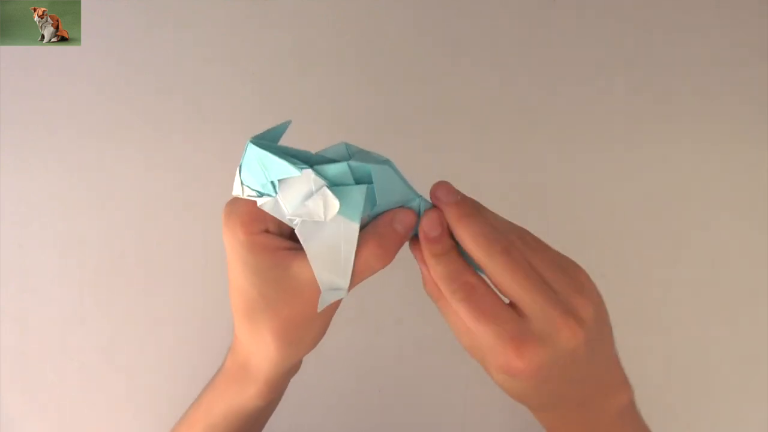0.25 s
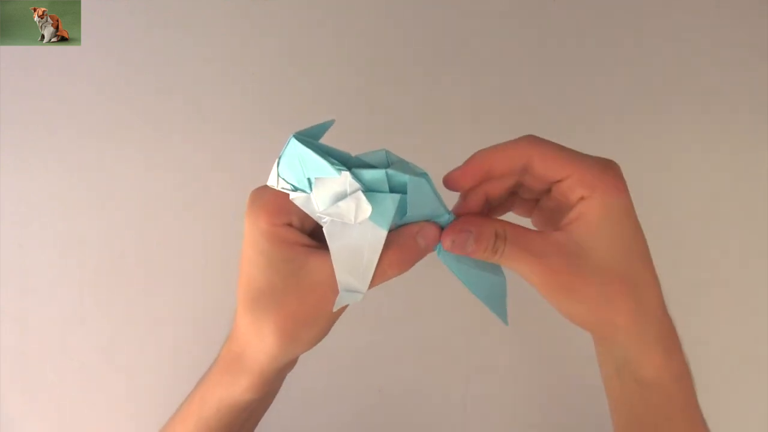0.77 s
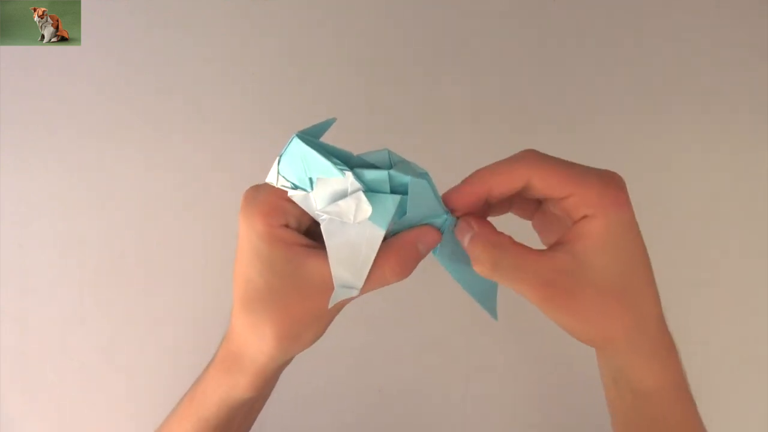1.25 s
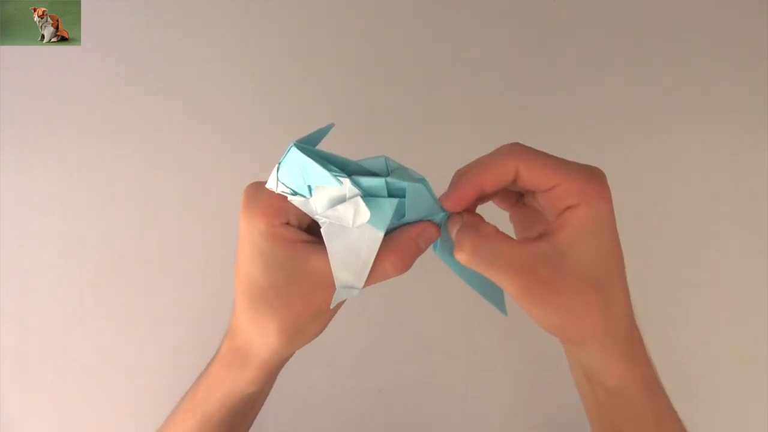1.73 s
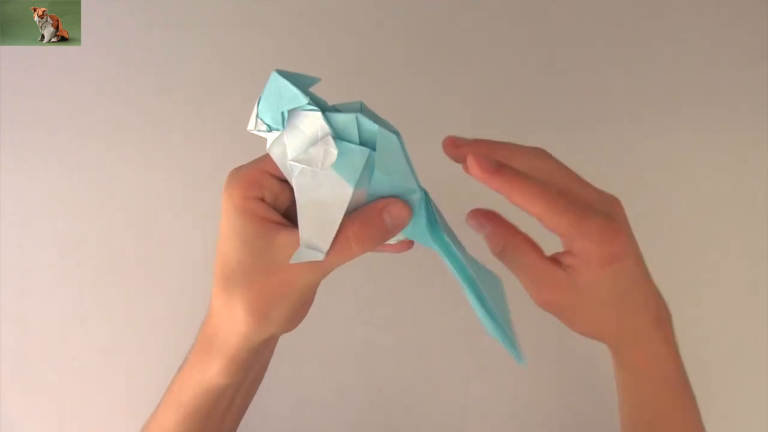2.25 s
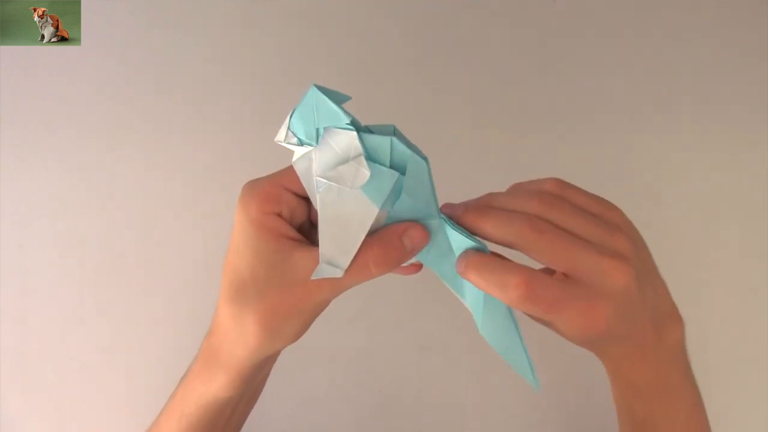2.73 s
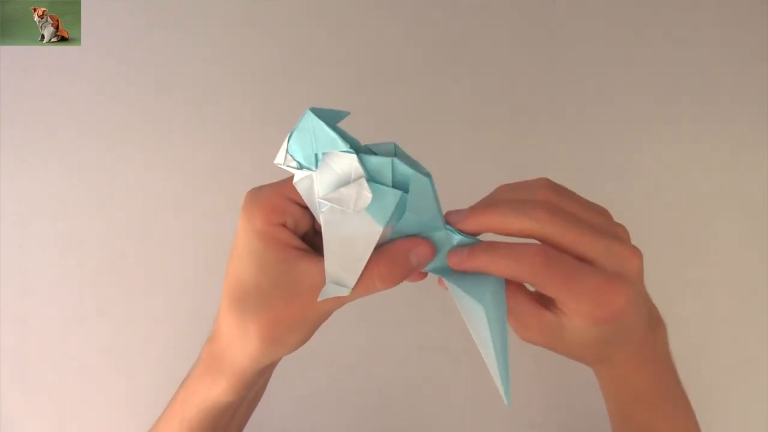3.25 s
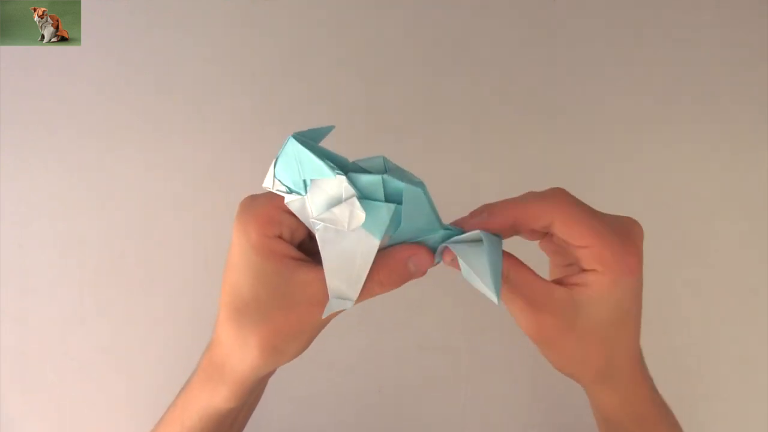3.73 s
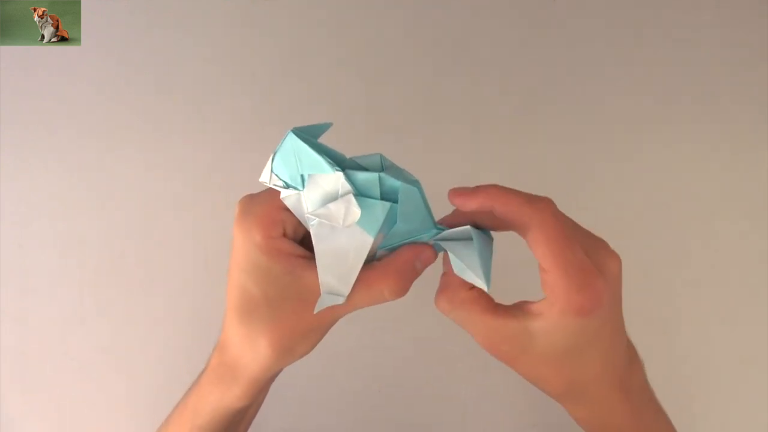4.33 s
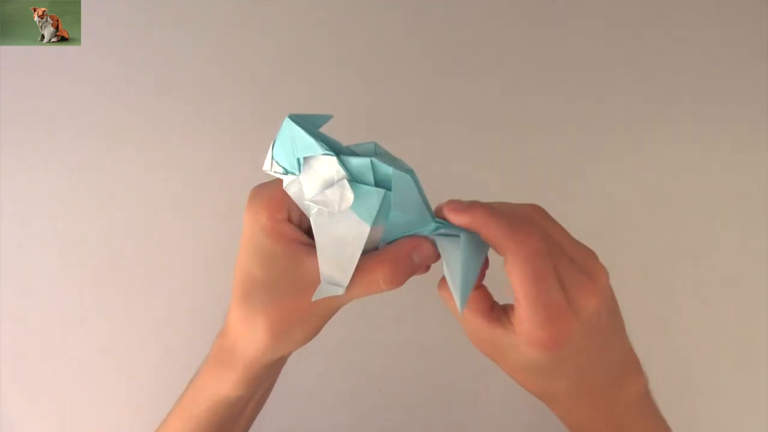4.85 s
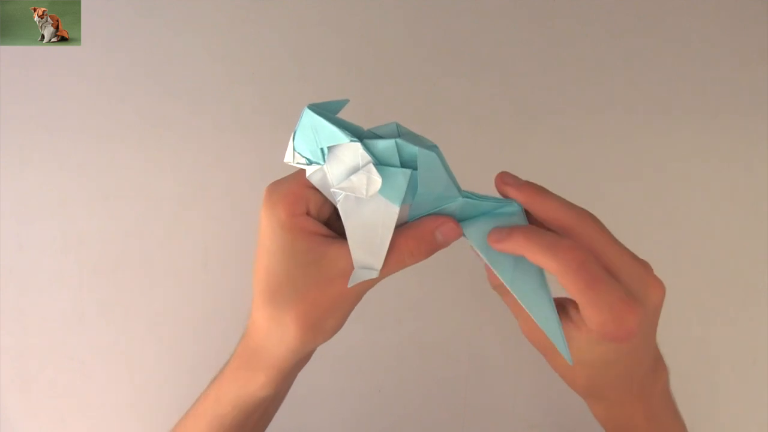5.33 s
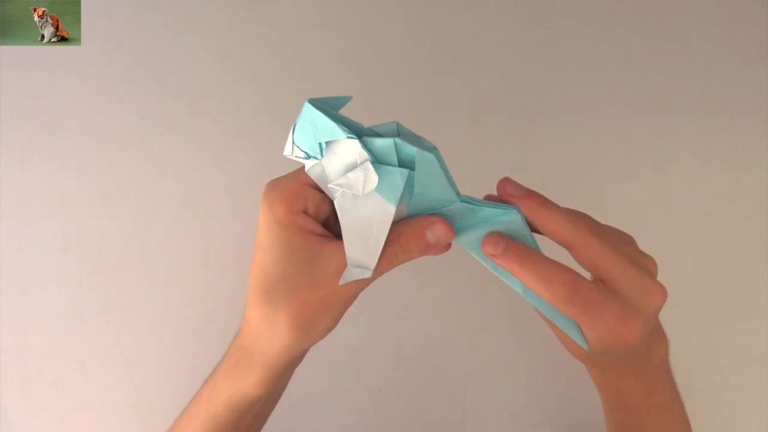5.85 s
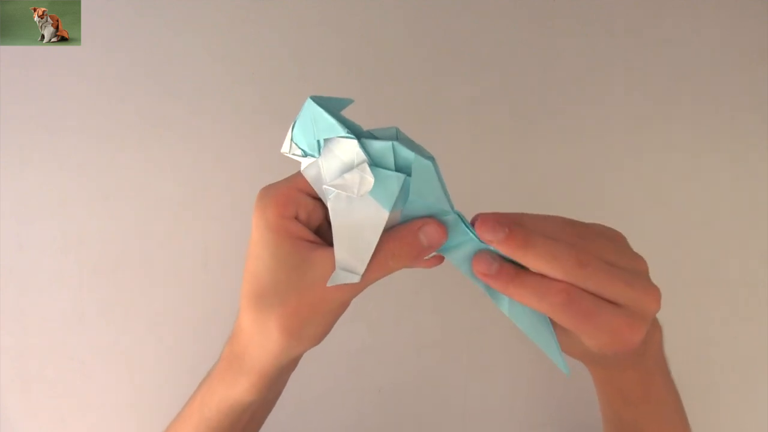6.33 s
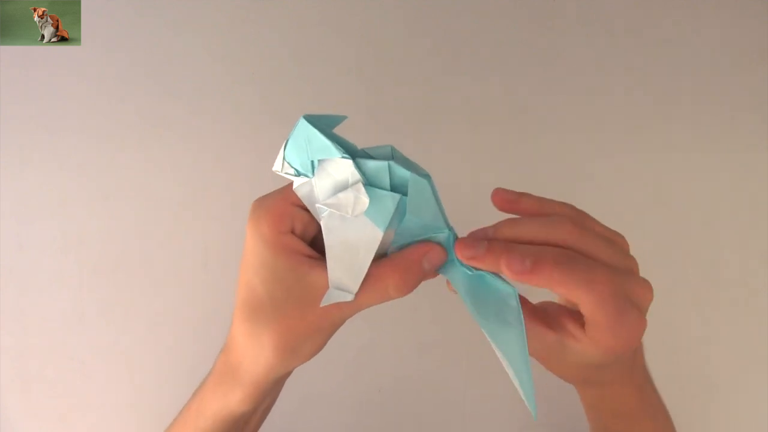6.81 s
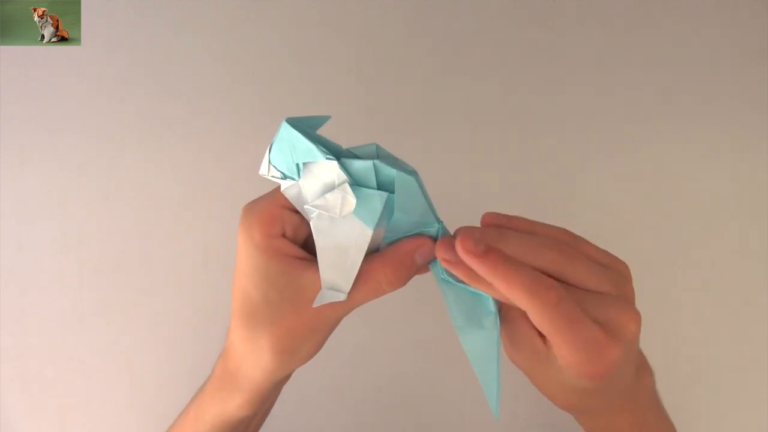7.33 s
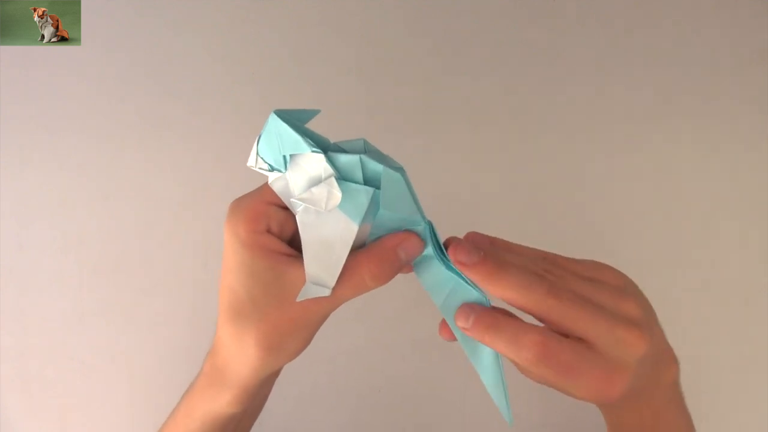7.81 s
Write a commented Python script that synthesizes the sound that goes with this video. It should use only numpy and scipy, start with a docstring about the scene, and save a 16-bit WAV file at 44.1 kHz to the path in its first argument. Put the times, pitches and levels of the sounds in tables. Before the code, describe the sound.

Close stereo pickup of hands working a small folded paper model in a bare, quiet room. After near silence, a tight cluster of bright crackles bursts just before one second, then single sharp snaps come at uneven gaps with tiny ticks and short grainy finger rubs between. A brief bright reverberation follows the louder snaps, and a low, steady airy rush lies underneath.

```python
"""Hands shaping a folded paper model

In a small, bare, quiet room, creases buckle with short dry snaps: shaped noise bursts coloured like paper.
Fingertips and paper layers slide with a grainy hiss, made of noise and random tiny ticks, and pinches
sound hollow pockets. A tabletop echoes the direct sound almost at once, and sparse random reflections add
a bright tail. Below it all lies a low steady rush of air, nearly unrelated left and right."""
import sys
import numpy as np
from scipy import signal
from scipy.fft import rfft, irfft, next_fast_len
from scipy.io import wavfile
from scipy.ndimage import uniform_filter1d

SR = 44100
rng = np.random.default_rng(int(sys.argv[2]) if len(sys.argv) > 2 else 0)


def wav_out(sig):
    """Save sig, one row per channel (or a flat mono array), as 16-bit PCM at SR to the path in sys.argv[1]."""
    wavfile.write(sys.argv[1], SR, np.round(np.clip(np.atleast_2d(sig).T, -1, 1) * 32767).astype(np.int16))


N = 355887  # length in samples


def gain_of(db):
    """Decibels to amplitude."""
    return 10 ** (np.asarray(db) / 20)


def evened(x):
    """Scales to rms 1."""
    return x / np.sqrt(np.mean(x ** 2) + 1e-20)


def read(points, hz):
    """Reads a spectrum table on a log-frequency axis."""
    f, value = np.transpose(points)
    return np.interp(np.log(hz + 1), np.log(f + 1), value)


def add(mix, s, sound):
    """Adds a stereo sound into the mix at time s, cutting whatever falls outside."""
    start = round(s * SR)
    sound = sound[:, max(-start, 0):]
    part = mix[:, max(start, 0):][:, :sound.shape[1]]
    part += sound[:, :part.shape[1]]


def lean(db):
    """Left and right gains for a left-over-right level difference."""
    return gain_of(np.array([[.5], [-.5]]) * db)


def noise_pair(apart, size):
    """Two noise channels, alike in the bass, drifting apart as waves get shorter than the microphone spacing."""
    shared = rng.standard_normal(size)
    own = signal.lfilter([1, -.75], [1, -.2], rng.standard_normal((2, size)))
    return (shared + apart * own) / np.hypot(1, apart)


def paper(x, hz, octaves, body_db, steep=2.07, size=1024):
    """Causal colour of paper: a broad hump from the moving facet plus the flexing of the whole model."""
    # Hollow resonances of the flexing model. Each row: frequency in Hz, relative level in dB.
    flexing = [(100, -40), (300, -7), (440, 1), (750, -2.5), (1060, 1), (1320, -4), (1900, -0.5),
               (3500, -4.5), (8000, -13), (16000, -43)]
    f = abs(np.fft.fftfreq(size, 1 / SR))
    # the hump falls to half amplitude this many octaves either side of its pitch
    facet = 1 / (1 + abs(np.log2((f + 1) / hz) / octaves) ** steep)
    body = gain_of(read(flexing, f) + body_db)
    log_gain = np.log(np.hypot(facet, body))
    # minimum phase, so nothing sounds ahead of its cause
    response = np.fft.ifft(np.exp(np.conj(signal.hilbert(log_gain)))).real
    return signal.fftconvolve(x, response[None, :size // 2], axes=1)[:, :x.shape[1]]


def snap(hz, octaves, body_db, ring, rise=0.00022, flutter_db=-24, flutter_t60=0.057,
         wobble_db=-7, wobble_t60=0.027, wobble_hz=800, crack_db=-1, crack_s=0.00021, apart=0.45, size=2048):
    """A crease flips: bending waves die fast, nearby layers flutter on faintly, and the model wobbles low."""
    t = np.arange(size) / SR
    flip = (1 - np.exp(-t / rise)) * gain_of(-60 * t / ring)
    crack = gain_of(crack_db) * np.exp(-t / crack_s)  # the fold's first sharp jump
    flutter = gain_of(flutter_db - 60 * t / flutter_t60)
    burst = noise_pair(apart, size) * (flip + crack + flutter)
    low_noise = signal.lfilter(*signal.butter(2, wobble_hz, fs=SR), noise_pair(apart, size))
    wobble = low_noise * gain_of(wobble_db - 60 * t / wobble_t60)
    spectrum = rfft(burst + wobble)
    # flatten the spectrum over wide bands, so the paper colour alone sets each snap's tone
    spectrum /= np.sqrt(uniform_filter1d(abs(spectrum) ** 2, size=64, axis=1))
    sound = paper(irfft(spectrum)[:, :-size // 8], hz, octaves, body_db)
    # as much energy in each channel as one millisecond at rms 1
    return sound * np.sqrt(SR / 1000 / np.sum(sound ** 2, axis=1, keepdims=True))


def snaps(count=5):
    """Buckling creases: each sends one waveform to the microphone and others toward the walls."""
    # Each row: start in seconds, level in dB over 1 ms ahead of the mix trims, facet pitch in Hz,
    # t60 of the flip in seconds, flexing body in dB.
    creases = [(0.4007, -37, 4100, 0.019, -9), (.536, -45.5, 4100, 0.02, 11), (0.5743, -44, 7300, 0.017, 5),
               (.7703, -43.5, 490, 0.018, -18), (0.8079, -23, 5160, 0.013, -1.5),
               (.884, -24, 3800, 0.023, -4.5), (0.8895, -26.5, 5800, 0.018, -23),
               (0.8938, -18.5, 7400, 0.011, -17), (.9066, -22, 6850, 0.0065, -17),
               (1.6383, -28.5, 2840, .014, -14), (1.984, -17.5, 6450, 0.014, -6.5),
               (2.1828, -38, 5500, 0.027, -3), (2.3104, -36, 6900, .01, -0.5),
               (2.6278, -41.5, 1010, 0.0076, -18), (2.641, -24.5, 6300, 0.008, -5),
               (2.6849, -36, 2300, 0.026, -5), (2.7539, -42.5, 1750, 0.0084, -16),
               (2.913, -41.5, 5500, 0.015, -2), (3.012, -21, 6700, 0.014, -7),
               (3.4144, -44.5, 866, 0.0075, -28), (4.2193, -31.5, 9250, 0.012, 0),
               (4.7835, -32.5, 5440, 0.012, 4.5), (4.9377, -31.5, 6470, 0.0064, -6.5),
               (5.0825, -40.5, 1120, 0.0094, -28), (5.181, -44.5, 3200, 0.012, -11),
               (5.2658, -28.5, 5300, 0.012, -3.5), (5.5587, -31, 6550, 0.0039, -11),
               (5.568, -27.5, 6140, 0.0028, -18), (5.68, -35.5, 6140, .006, -8),
               (5.71, -37.5, 5930, 0.012, -17), (5.952, -25.5, 7300, 0.003, -9.5),
               (5.9678, -19, 3100, 0.013, -9), (6.0201, -34.5, 3630, 0.015, 0),
               (6.2, -39.5, 6900, 0.02, -2), (6.3273, -32, 1760, .008, -13.5),
               (6.4002, -37, 4780, 0.0066, -5), (6.4577, -38.5, 5200, 0.022, -3),
               (6.6186, -29.5, 6900, 0.0057, -8), (6.9263, -40.5, 3470, 0.013, -8),
               (7.0088, -43.5, 2800, 0.017, -16), (7.1381, -41.5, 5360, 0.014, -6),
               (7.4988, -22, 7560, 0.0041, -13.5), (7.521, -40, 2200, .018, -3),
               (7.7864, -30, 5860, 0.016, -4.5), (7.8097, -18.5, 5020, 0.0098, -16),
               (7.8743, -37, 5200, 0.017, 3)]
    middling_ring_s, middling_hz = .012, 5500
    middling_octaves, widen_with_ring, widen_with_pitch = 0.77, 0.96, 0.23
    send_base_db, send_db_per_doubling = -4, 5.5
    near, spread = np.zeros((2, N)), np.zeros((count, 2, N))
    for s, db, hz, ring, body_db in creases:
        # a longer ring means a larger facet, wider in colour and louder in the room
        largeness = ring / middling_ring_s
        octaves = middling_octaves * largeness ** widen_with_ring * (hz / middling_hz) ** widen_with_pitch
        add(near, s, gain_of(db) * snap(hz, octaves, body_db, ring))
        send_db = send_base_db + send_db_per_doubling * np.log2(largeness)
        send = gain_of(db + send_db) / np.sqrt(count)
        for direction in spread:
            add(direction, s, send * snap(hz, octaves, body_db, ring))
    return near, spread


def rub(speed, hz, octaves, body_db, catches_per_s=560, catch_spread_db=2.5, catch_t60=0.009,
        hiss=0.72, apart=0.49):
    """Fibres catch and let go in tiny ticks over a smooth sliding hiss, louder as the paper slides faster."""
    size = len(speed)
    strengths = gain_of(catch_spread_db * np.minimum(rng.exponential(1, size), 4))
    catches = strengths * (rng.random(size) < catches_per_s / SR)
    # every catch dies away exponentially
    grain = evened(signal.lfilter([1], [1, -gain_of(-60 / (catch_t60 * SR))], catches))
    friction = noise_pair(apart, size) * np.hypot(hiss, grain)
    return speed * evened(paper(friction, hz, octaves, body_db))


def strokes(trim_db=-0.5):
    """Finger strokes, and hard pinches that make hollow pockets of the model sound: each swells and fades."""
    # Sliding strokes. Each row: peak time in seconds, length in seconds, level in dB ahead of the trim,
    # pitch in Hz, flexing body in dB.
    slides = [(0.122, 0.099, -55, 6300, -7.5), (0.202, 0.043, -49.5, 3800, -20),
              (0.427, 0.041, -52, 4300, -11), (0.903, 0.034, -36.5, 5400, -6.5),
              (1.199, 0.17, -57, 6800, -4), (1.433, .05, -54, 6200, -4), (1.966, 0.085, -44, 6670, 1.5),
              (2.1, .037, -44, 5200, 4.5), (2.656, 0.034, -44.5, 4900, 3.5), (2.759, 0.067, -49, 2110, -4),
              (2.94, 0.066, -57, 6640, -16), (3.203, .065, -53.5, 5760, -3), (3.322, 0.042, -49, 6500, -9),
              (3.469, 0.059, -48, 6900, -11), (3.904, 0.026, -49, 7400, -3), (4.243, 0.16, -56, 6600, -10),
              (4.852, 0.06, -55.5, 6000, -11), (4.964, 0.057, -53.5, 6460, -4),
              (5.182, 0.055, -55.5, 6500, 2), (5.407, .044, -56, 6000, 1.5),
              (5.556, 0.087, -48.5, 6060, -2), (5.714, 0.019, -42, 4300, -13),
              (5.925, 0.039, -52.5, 6940, -1), (6.014, 0.023, -46, 3350, 4), (6.217, 0.048, -56, 5800, -6),
              (6.367, 0.041, -53, 2580, -13), (7.079, 0.12, -62.5, 4600, 7), (7.521, 0.073, -48, 5200, -1),
              (7.646, 0.059, -49.5, 5800, -6.5), (7.883, 0.24, -54, 4870, -20),
              (8.028, 0.18, -59, 4500, -7)]
    # Hard pinches. Each row: peak time in seconds, length in seconds, level in dB ahead of the trim,
    # pocket pitch in Hz.
    pinches = [(0.774, 0.016, -45.5, 435), (1.995, 0.029, -44.5, 385), (2.106, 0.061, -54.5, 348),
               (2.318, 0.016, -48.5, 418), (2.638, 0.1, -54.5, 373), (2.749, .1, -59, 1800),
               (5.565, 0.041, -53, 1100)]
    bright_hz, bright_octaves, widen_when_dull, widest_octaves = 6500, 0.82, 2.1, 1.9
    pocket_width_hz, pocket_body_db = 270, -17.5
    swell_share = 0.51  # share of the length spent swelling
    out, t = np.zeros((2, N)), np.arange(-SR // 5, SR // 5) / SR
    stretch = t / np.where(t < 0, swell_share, 1 - swell_share)
    for s, length, db, hz, body_db in slides:
        speed = np.exp(-(stretch / length) ** 2)
        # a bright stroke is narrow in colour, a duller one wider
        octaves = min(bright_octaves * (bright_hz / hz) ** widen_when_dull, widest_octaves)
        add(out, s + t[0], gain_of(db + trim_db) * rub(speed, hz, octaves, body_db))
    for s, length, db, hz in pinches:
        speed = np.exp(-(stretch / length) ** 2)
        # a pocket's resonance is about as many Hz wide at any pitch
        octaves = np.log2(1 + pocket_width_hz / 2 / hz)
        add(out, s + t[0], gain_of(db + trim_db) * rub(speed, hz, octaves, pocket_body_db))
    return out


def grip(hz=6200, octaves=0.78, body_db=-2, tick_over_db=11, tick_ring=0.013, count=24):
    """The holding fingers never rest: a faint rustle, and tiny creases that give way at random moments."""
    # Loudness of the rustle as the grip shifts. Each row: time in seconds, level in dB.
    rustle = [(0, -57), (.07, -65.5), (1.7, -76), (1.82, -65), (2.3, -77), (4.5, -78.5), (4.68, -64.5),
              (5.3, -70.5), (5.87, -62.5), (6.1, -79), (6.55, -64.5), (6.72, -69), (6.92, -69.5),
              (7.4, -74)]
    level = gain_of(np.interp(np.arange(N) / SR, *np.transpose(rustle)))
    out = rub(level, hz, octaves, body_db)
    for when, pitch in rng.random((count, 2)):
        at = int(when * N)
        tick_hz = hz * 2 ** (pitch - .5)  # up to half an octave either way
        tick = snap(tick_hz, octaves, body_db, tick_ring)
        add(out, at / SR, level[at] * gain_of(tick_over_db) * tick)
    return out


def table_and_ports(x, strength=0.32, delay_s=.00151, dull_hz=1700, right_lag_s=.000016):
    """The sheet's back radiates in opposite phase; the table returns that, dulled by the hands, to two ports."""
    # Direct sound from the hands is shaded differently at the two ports.
    # Each row: frequency in Hz, left-over-right level in dB.
    shading = [(500, -0.5), (1100, -2), (2200, 2.5), (3600, -1), (4800, 5), (6200, 9), (8000, 3.5),
               (10500, 0.5), (13500, -3.5)]
    size = 2 * next_fast_len(N // 2 + SR // 10)
    f = np.fft.rfftfreq(size, 1 / SR)
    echo = strength * np.exp(-2j * np.pi * f * delay_s) / np.hypot(1, (f / dull_hz) ** 2)
    lag = np.exp(-2j * np.pi * f * np.array([[0], [right_lag_s]]))
    ports = lean(read(shading, f)) * lag
    return irfft(rfft(x, size) * (1 - echo) * ports)[:, :N]


def walls(x):
    """A few distinct early echoes from the nearest flat surfaces stand out of the tail."""
    # Each row: delay in seconds, level in dB, left-over-right level in dB.
    echoes = [(.009, -30, -6), (0.0136, -19, -5), (0.0195, -30, 7)]
    out = np.zeros((2, N))
    for delay, db, side_db in echoes:
        add(out, delay, gain_of(db) * lean(side_db) * x)
    return out


def room(x, first_s=0.0025, build_s=0.0095, taps_per_s=6000, spread_db=3.0, even_out_s=0.032, size=256):
    """Sparse random wall reflections build into a tail, each band dying at its own speed."""
    # How fast the room dies. Each row: frequency in Hz, t60 in seconds.
    decay = [(250, 0.36), (800, 0.51), (2000, 0.51), (4500, 0.6), (8000, 0.49), (14000, 0.48)]
    # How strongly the room answers. Each row: frequency in Hz, relative level in dB.
    colour = [(200, -14), (700, 6.5), (1500, 1), (3500, 2), (7000, 4.5), (11000, 1.5), (15000, 3.5)]
    t = np.arange(SR * 3 // 4) / SR
    taps = rng.standard_normal((2, len(t))) * (rng.random((2, len(t))) < taps_per_s / SR)
    # early reflections differ more in strength than late ones
    boost_db = spread_db * np.minimum(rng.exponential(1, taps.shape), 4)
    taps *= gain_of(boost_db * np.exp(-t / even_out_s))
    taps *= np.clip((t - first_s) / build_s, 0, 1)
    hz, when, bands = signal.stft(taps, SR, nperseg=size)
    bands *= gain_of(read(colour, hz)[:, None] - 60 * when / read(decay, hz)[:, None])
    tail = signal.istft(bands, SR, nperseg=size)[1]
    tail /= np.linalg.norm(tail, axis=1, keepdims=True)
    return signal.oaconvolve(x, tail, axes=1)[:, :N]


def air(level_db=-56):
    """Steady air and microphone hiss: noise shaped to a low rush, nearly unrelated in the two channels."""
    # Spectrum of the rush. Each row: frequency in Hz, relative density in dB per Hz.
    rush = [(20, -11), (45, -12), (80, -5), (120, -2.5), (170, -1.5), (260, -3), (400, -4.5), (600, -8),
            (1000, -13), (1500, -16), (3000, -19), (7000, -22), (12000, -27.5), (14500, -23.5)]
    # Likeness of the two channels. Each row: frequency in Hz, coherence from 0 to 1.
    likeness = [(50, 0.12), (130, 0.26), (300, 0.088), (1000, 0.13), (15000, 0.11)]
    # Lean to the left. Each row: frequency in Hz, left-over-right level in dB.
    side = [(50, 1), (130, 3.5), (380, 2.5), (1200, 1), (15000, -1.2)]
    size = next_fast_len(N)
    f = np.fft.rfftfreq(size, 1 / SR)
    a, b = rfft(rng.standard_normal((2, size)))
    same = read(likeness, f)
    pair = np.array([a, same * a + np.sqrt(1 - same ** 2) * b])
    shaped = pair * gain_of(read(rush, f)) * lean(read(side, f))
    return gain_of(level_db) * evened(irfft(shaped, size)[:, :N])


def scene(snap_db=-0.45, snap_room_db=-0.5, stroke_room_db=-3.0):
    """Snaps, strokes and the rustling grip above the table, their echo in the room, and the air."""
    near, spread = snaps()
    sliding = strokes() + grip()
    direct = table_and_ports(gain_of(snap_db) * near + sliding)
    # every direction takes its own paths around the room
    snap_echo = sum(room(direction) for direction in spread)
    tail = gain_of(snap_room_db) * snap_echo + gain_of(stroke_room_db) * room(sliding)
    return direct + walls(direct) + tail + air()


def record(dry, edge_hz=16100):
    """Microphone colour as a frequency-dependent gain, then a steep lowpass as the band limit."""
    # Microphone colour. Each row: frequency in Hz, gain in dB.
    microphone = [(100, 1), (1000, 0), (1300, 0.5), (1700, 1), (6000, 0), (12000, 2), (15000, -6),
                  (16500, -28)]
    size = 2 * next_fast_len(N // 2 + SR // 10)
    f = np.fft.rfftfreq(size, 1 / SR)
    coloured = irfft(rfft(dry, size) * gain_of(read(microphone, f)))[:, :N]
    lowpass = signal.firwin(511, edge_hz, window=("kaiser", 9), fs=SR)
    return signal.oaconvolve(coloured, lowpass[None], "same", axes=1)


dry = scene()
out = record(dry)
wav_out(out)
```